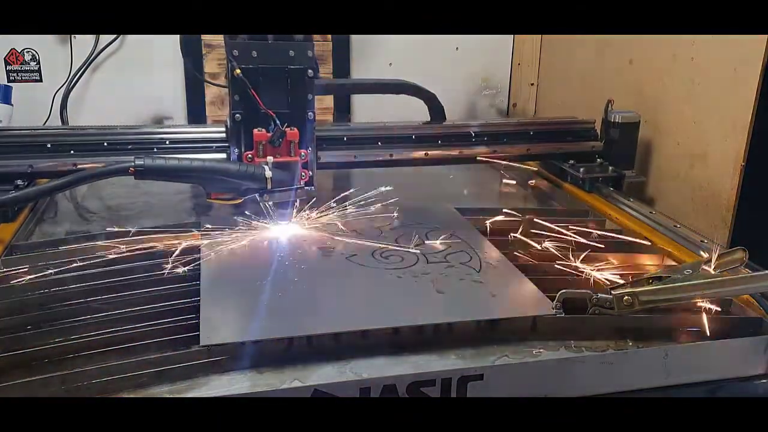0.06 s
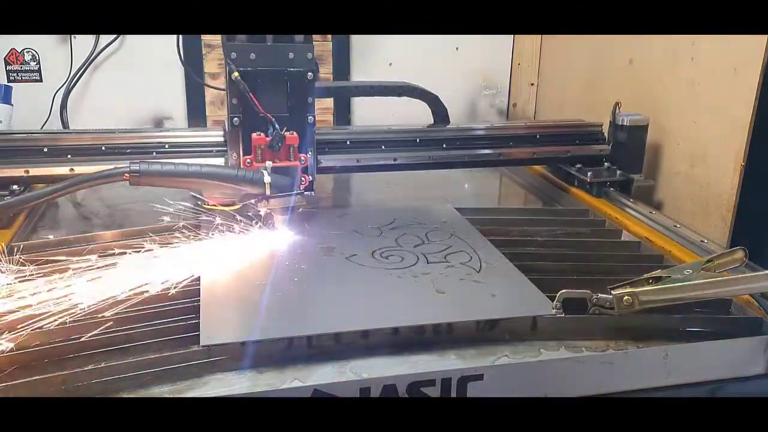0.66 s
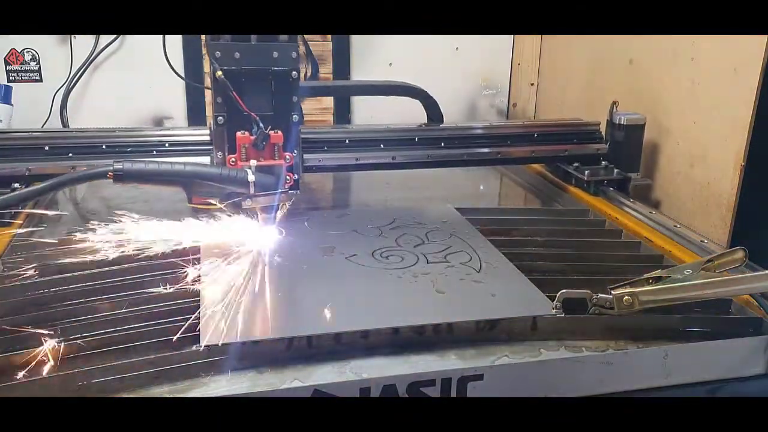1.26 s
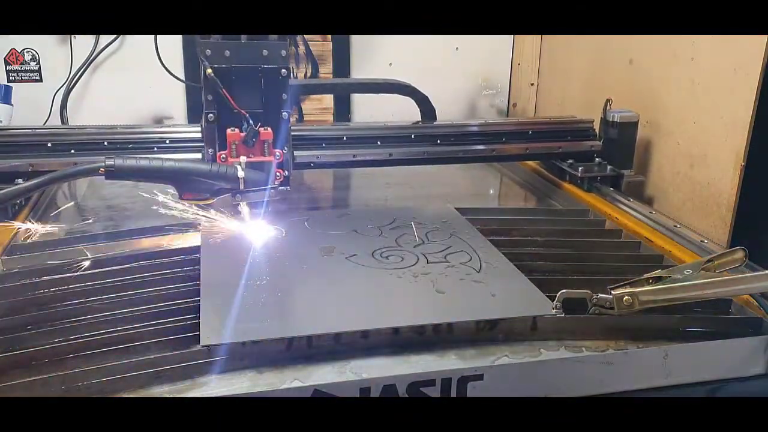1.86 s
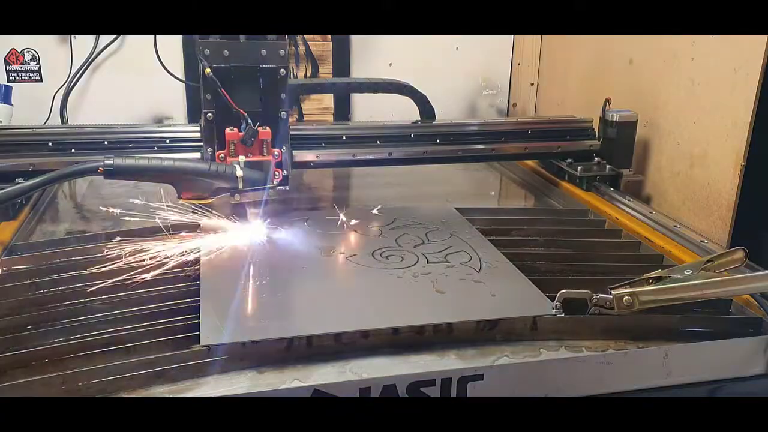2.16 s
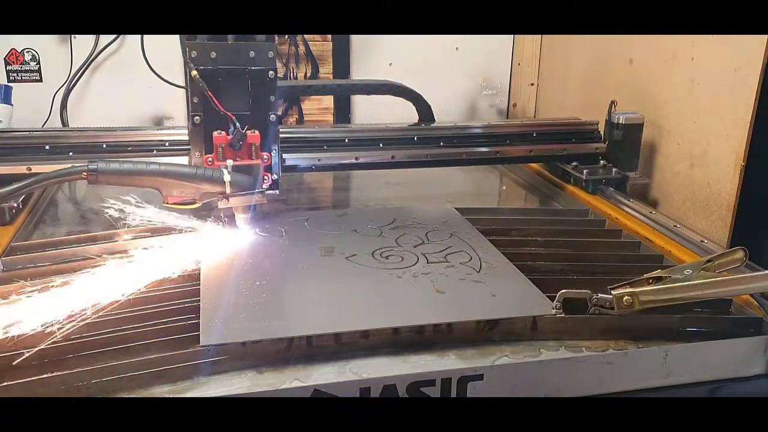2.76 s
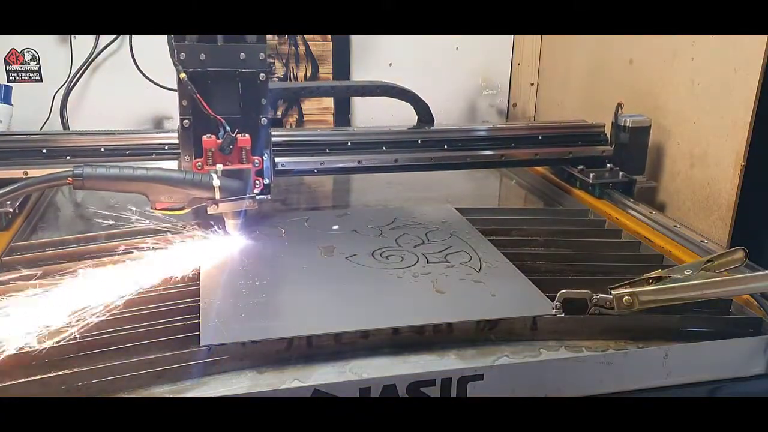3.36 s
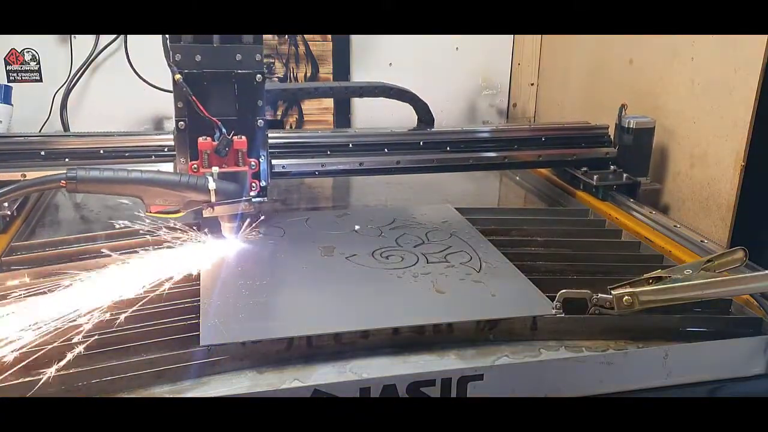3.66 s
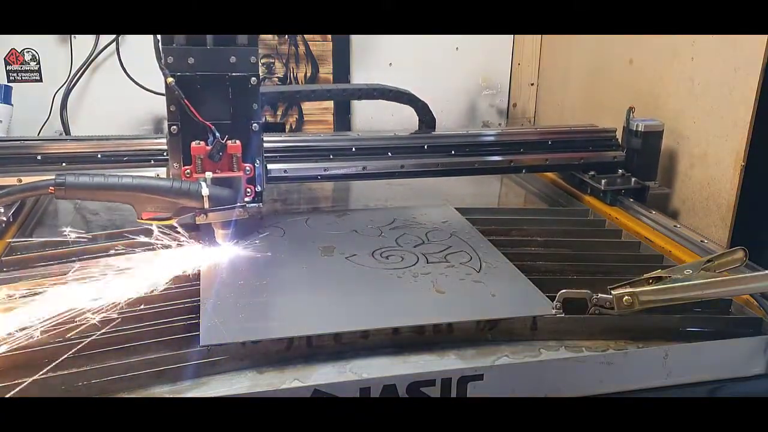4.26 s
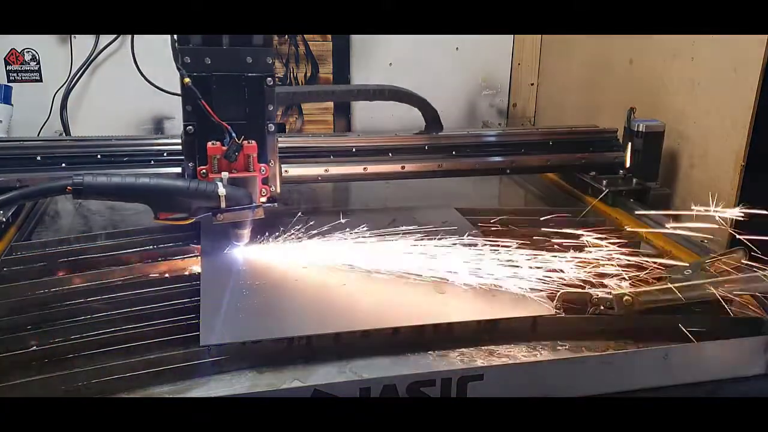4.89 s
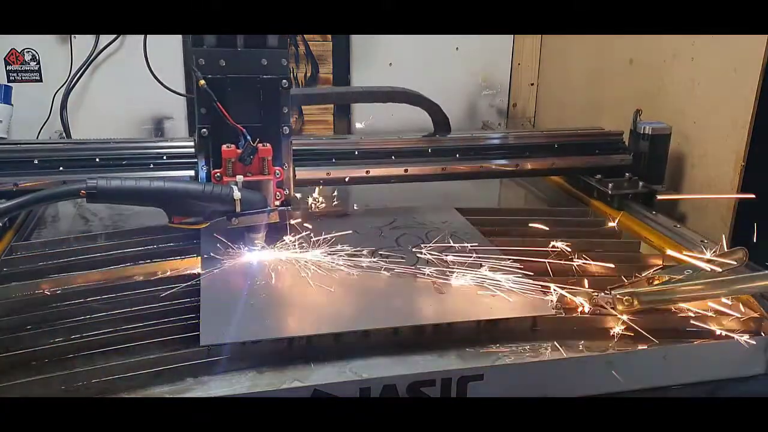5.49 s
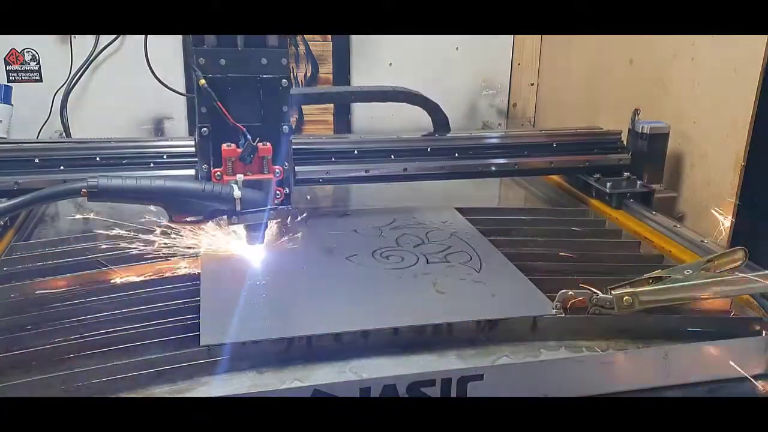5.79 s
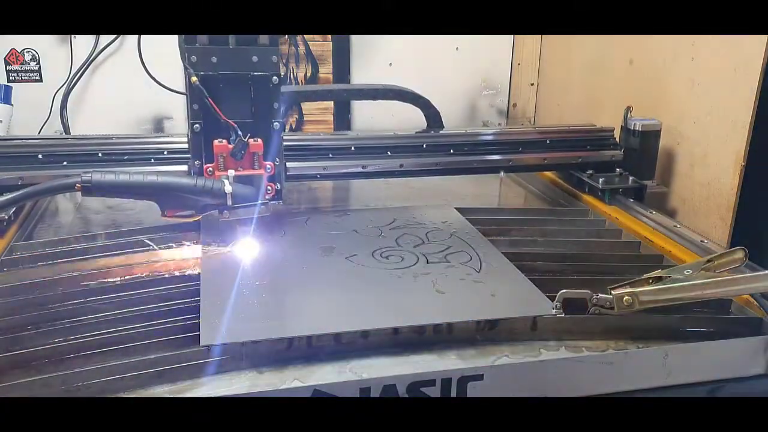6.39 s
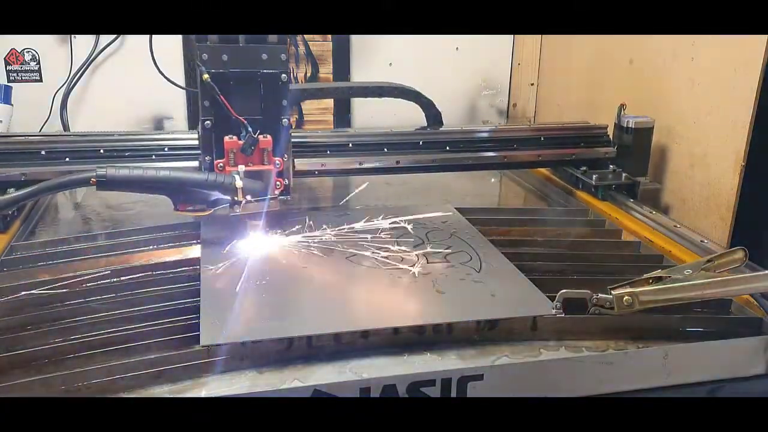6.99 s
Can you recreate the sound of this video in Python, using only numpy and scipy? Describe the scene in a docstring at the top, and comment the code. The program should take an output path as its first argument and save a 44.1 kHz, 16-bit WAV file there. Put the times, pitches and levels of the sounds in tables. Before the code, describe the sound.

The harsh, unbroken hiss of a plasma cutter fills a workshop as it moves through a steel sheet. A rasp and a hollow roar ride along with it, sputtering in brief surges, and howls and whistles come and go at changing pitches. Fine ticks of slag run throughout. The stereo microphone stands beside the cutting table and picks up a faint low rumble and hum.

```python
"""Plasma torch over a water table

In a workshop, a machine-guided torch cuts sheet steel above a slatted water table, the left side of the
stereo microphone a little nearer to it. The air jet hisses at the nozzle, rasps through the kerf and
roars in the hollow under the sheet. It howls and whistles on the kerf's resonances and flares where it
catches an edge. Slag crackles; air rumbles faintly on the microphone, and machinery hums."""
import sys
import numpy as np
from scipy import signal
from scipy.fft import rfft, irfft, next_fast_len
from scipy.io import wavfile
from scipy.ndimage import uniform_filter1d, map_coordinates

SR = 44100
rng = np.random.default_rng(int(sys.argv[2]) if len(sys.argv) > 2 else 0)


def digitize_waveform(pressure):
    """Quantize a signal to 16-bit integers and store it at the path in sys.argv[1].

    Rows of a 2-D input are taken as channels; values are limited to [-1, 1].
    """
    field = np.atleast_2d(pressure).T
    bounded = np.clip(field, -1, 1)
    quanta = np.round(bounded * 32767).astype(np.int16)
    wavfile.write(sys.argv[1], SR, quanta)


N = 319284
TIME = np.arange(N) / SR
BIN_HZ = np.fft.rfftfreq(1024, 1 / SR)[:, None]  # rows of a short-time spectrum


def amp(db):
    """Decibels to gain."""
    return 10 ** (np.asarray(db) / 20)


def unit(x):
    """x at rms 1."""
    return x / np.sqrt(np.mean(x ** 2) + 1e-20)


def bell(x):
    """A Gaussian of height 1 and width 1."""
    return np.exp(-.5 * x ** 2)


def along(points, hz):
    """(f/Hz, value) points read on a log axis."""
    freqs, values = np.transpose(points)
    return np.interp(np.log(hz + 1), np.log(freqs + 1), values)


def curve(points, t=TIME):
    """(t/s, value) points read at times t."""
    return np.interp(t, *np.transpose(points))


def wobble(rate):
    """A smooth random curve, rate knots a second."""
    knots = rng.standard_normal(int(N * rate / SR) + 4)
    return map_coordinates(knots, [TIME * rate])


def filtered(x, response):
    """x times a response of frequency."""
    n = x.shape[-1]
    padded = next_fast_len(n + SR // 8, True)
    return irfft(rfft(x, padded) * response(np.fft.rfftfreq(padded, 1 / SR)), padded)[..., :n]


def steady(x):
    """x with its slow changes of level evened out."""
    power = uniform_filter1d(np.mean(x ** 2, axis=0), size=SR // 8)
    return x / np.sqrt(np.abs(power) + 1e-12)


# resonances of the sheet, the table and the corner of the room: f/Hz, width/Hz, lift/dB
RESONANCES = [(276.5, 23.6, 9.5), (339, 48, 8.5), (414.5, 12, 9.5), (457, 21, 5.5), (540.8, 29, 14),
              (576.7, 18, 10.5), (621, 20, 9.5), (684, 17.5, 10.5), (752.5, 17, 10.5), (810, 26, 12),
              (942, 30, 8.5), (1031, 35, 9.5), (1079, 37, 5), (1138, 12, 7), (1202, 21, 5.5),
              (1310.4, 24, 12), (1444, 38, 9), (1575, 79, 5.5), (1733, 28, 6.5), (1835, 56, 4.5),
              (2666, 210, 3.5), (2890, 150, 1)]
# likeness of left and right at the microphone: f/Hz, likeness (1 or more is mono)
STEREO_LIKENESS = [(200, 2.5), (260, 5), (340, 1.1), (450, 0.98), (750, 0.26), (1300, 0.29), (2000, 0.03),
                   (3000, 0.19), (5000, 0.09), (8000, 0.11), (15000, 0.12)]
# echoes off the side walls: delay/s
WALL_DELAYS = [.0047, .0113, .0171, .026]
# the walls' part in the left-right difference: f/Hz, share
WALL_ECHO_SHARE = [(300, 0.83), (1400, 1), (3000, 0.68), (6000, 0.044)]

def in_workshop(pair, colour):
    """Two noises as they reach the microphone: coloured, rung through the table, spread wide; rms 1."""
    def response(hz):
        lift_db = sum(db / (1 + (2 * (hz - centre) / width) ** 2) for centre, width, db in RESONANCES)
        spread = np.arccos(np.clip(along(STEREO_LIKENESS, hz), -1, 1)) / 2
        share = np.clip(along(WALL_ECHO_SHARE, hz), 0, 1)
        echoes = sum(np.exp(-2j * np.pi * hz * delay) for delay in WALL_DELAYS)
        wall_path = np.sin(spread) * share * np.exp(1j * np.angle(echoes))
        diffuse_path = np.sin(spread) * np.sqrt(1 - share ** 2)
        return colour(hz) * amp(lift_db) * np.array([np.cos(spread), wall_path, diffuse_path])
    mid, echo, diffuse = filtered(pair[[0, 0, 1]], response)
    return unit(np.array([mid + echo + diffuse, mid - echo - diffuse]))


def rush(spectrum, pair):
    """Two noises shaped by (f/Hz, level/dB) points and heard across the workshop."""
    return in_workshop(pair, lambda hz: amp(along(spectrum, hz)))


def eddies(patchy_db, echo_db, colour_db=None):
    """Two patchy noises, combed by nearby reflections whose paths drift as the torch moves."""
    _, t, spectra = signal.stft(rng.standard_normal((2, N)), SR, nperseg=1024)
    patches = rng.standard_normal(spectra.shape[1:])
    for _ in range(2):
        patches = uniform_filter1d(patches, size=16, axis=0)
        patches = uniform_filter1d(patches, size=3, axis=1)
    combs = np.zeros(spectra.shape)
    for comb in combs:
        for delay in rng.uniform(0.001503, .009, size=6):
            drift = .00012 * np.sin(2 * np.pi * (rng.uniform(0.1914, .7) * t + rng.random()))
            comb += np.cos(2 * np.pi * BIN_HZ * (delay + drift))
    gain_db = patchy_db * unit(patches) + echo_db * unit(combs) + (colour_db(t) if colour_db else 0)
    return signal.istft(spectra * amp(gain_db), nperseg=1024)[1][:, :N]


# moments when the jet catches on nothing: t/s, depth/dB, f/Hz, half length/s
JET_LULLS = [(0.838, 11, 3000, .031), (1.127, 9, 600, 0.027), (1.605, 4, 4800, .022),
             (2.198, 6.5, 1200, 0.031), (2.2, 2, 9000, 0.044), (2.298, 7, 2500, .016),
             (3.174, 5.5, 4800, 0.047), (3.199, 8, 1500, 0.018), (3.282, 5.5, 1010, 0.014),
             (3.355, 7, 2000, 0.014), (3.434, 6, 7000, .03), (3.508, 7, 2200, 0.022),
             (3.593, 9, 3300, 0.0098), (3.92, 3, 1200, 0.034), (4.24, 7, 2300, 0.019),
             (5.02, -1, 4500, .025), (5.81, 12, 1460, 0.034), (6.335, 4.5, 546, 0.035),
             (6.495, 6, 2600, .016)]

def lull(hz, reach_octaves=0.82):
    """The dB that the part of the jet around hz loses in the lulls, at each sample."""
    return sum(db * bell(np.log2(hz / centre) / reach_octaves) * bell((TIME - s) / length)
               for s, db, centre, length in JET_LULLS)


# resonance of the gap under the torch: t/s, f/Hz
GAP_TUNING = [(0, 1120), (.5, 1090), (1.2, 1170), (1.9, 1260), (3.0, 1380), (3.2, 1460), (3.42, 1150),
              (3.85, 1290), (4.05, 1620), (4.24, 1230), (4.45, 1330), (5.35, 1260), (6.6, 1320),
              (6.78, 940), (7.24, 950)]

def gap_resonance(t, lift_db=7, octaves=0.14):
    """The gap's peak shifts as the torch travels: its lift in dB over frequency and time."""
    detuning = np.log2((BIN_HZ + 1) / curve(GAP_TUNING, t))
    return lift_db / (1 + (detuning / octaves) ** 2)


# the jet from top to bottom; spectra: f/Hz, level/dB; levels before trim and flutter: t/s, level/dB
HISS_SPECTRUM = [(1000, -63), (3000, -5.5), (4800, 0), (6300, 1.5), (7700, 1), (8700, -3), (9800, -3),
                 (11600, 0.5), (13500, 0.5), (15500, -0.5)]  # at the nozzle
HISS_LEVEL = [(0.0, -25.5), (0.14, -27.5), (0.33, -24), (.62, -27), (.76, -29), (.94, -27), (1.1, -30),
              (1.26, -24.5), (1.42, -29), (2.03, -27), (2.25, -27.5), (2.42, -27.5), (2.92, -26.5),
              (3.45, -28.5), (3.7, -29), (4.05, -25.5), (4.3, -27.5), (4.84, -29), (5.45, -28.5),
              (5.62, -26), (5.9, -28.5), (6.3, -25.5), (6.68, -29.5), (7.24, -27.5)]
RASP_SPECTRUM = [(900, -27), (1700, -2.5), (2050, 0.5), (2350, -3.5), (2750, 0.5), (3600, 1), (4600, -4),
                 (6500, -10), (12000, -17.5)]  # in the kerf
RASP_LEVEL = [(0, -28.5), (.2, -33), (1.3, -31.5), (2.05, -31), (2.25, -32), (2.55, -34.5), (2.8, -31),
              (3.1, -31.5), (3.55, -35.5), (3.95, -32.5), (4.5, -30), (5.0, -33.5), (5.3, -30.5),
              (5.7, -30), (6.05, -33.5), (6.55, -32), (6.8, -32), (7.24, -32.5)]
ROAR_SPECTRUM = [(300, -28), (700, -17), (900, -6.5), (1100, -1), (1300, 0), (1600, 0), (2000, -3.5),
                 (2600, -5.5), (5000, -10.5)]  # under the sheet
ROAR_LEVEL = [(0.0, -33), (0.55, -34), (1.12, -31), (1.28, -27.5), (2.16, -31), (2.6, -28.5), (2.85, -29),
              (3.4, -26.5), (3.52, -32), (4.28, -34.5), (4.4, -28.5), (4.76, -29), (4.96, -37.5),
              (5.28, -30.5), (6.03, -30), (6.17, -27.5), (6.33, -30), (6.56, -27.5), (6.8, -37),
              (7.08, -41.5), (7.24, -32.5)]
BOOM_SPECTRUM = [(100, -56), (170, -24), (220, -16.5), (255, -13.5), (298, -18.5), (335, -8.5), (490, -5.5),
                 (600, -2.5), (800, -5.5), (875, -5), (1020, -6.5), (1300, -12), (2500, -20)]  # down between the slats
BOOM_LEVEL = [(0.0, -35), (0.55, -38), (0.85, -31), (1.16, -38), (1.4, -36), (1.7, -37.5), (2.25, -37),
              (2.5, -38), (3.0, -38.5), (3.12, -37.5), (3.9, -40), (4.12, -39), (4.45, -36.5), (4.7, -34),
              (5.0, -36), (5.48, -33), (5.64, -38.5), (5.8, -30.5), (6.15, -30.5), (6.35, -36), (6.6, -32),
              (7.24, -37)]

def jet():
    """Turbulent air hisses, rasps, roars and booms on its way through the sheet, shaken by the melt."""
    surge = wobble(rate=9)  # the melt builds up and is blown clear
    boom_waver = wobble(rate=18)
    melt = wobble(rate=45)
    sputter = wobble(rate=290)  # the arc's foot jumps about in the kerf
    hiss = rush(HISS_SPECTRUM, eddies(patchy_db=1.24, echo_db=3.0))
    rasp = steady(rush(RASP_SPECTRUM, eddies(patchy_db=2.5, echo_db=4.5)))
    roar = steady(rush(ROAR_SPECTRUM, eddies(patchy_db=1.15, echo_db=4.0, colour_db=gap_resonance)))
    boom = steady(rush(BOOM_SPECTRUM, eddies(patchy_db=2.2, echo_db=2.2)))
    hiss_flicker = 0.23 * wobble(rate=33) + 0.29 * sputter
    hiss_db = curve(HISS_LEVEL) + 0.4 - lull(hz=8750) + 0.98 * surge + hiss_flicker
    rasp_db = curve(RASP_LEVEL) + 1.25 - lull(hz=3000) + 0.67 * surge + 1.1 * melt + .5 * sputter
    roar_db = curve(ROAR_LEVEL) + 0.35 - lull(hz=1300) + 1.2 * surge + 1.2 * melt + .5 * sputter
    boom_db = curve(BOOM_LEVEL) - 0.8 - lull(hz=554) + 0.71 * boom_waver + 1.5 * melt
    return amp(hiss_db) * hiss + amp(rasp_db) * rasp + amp(roar_db) * roar + amp(boom_db) * boom


# held resonances of the kerf or the slats: start/s, end/s, level/dB, f/Hz, width/Hz
HELD_HOWLS = [(0, 0.394, -45.5, 560, 50), (0, .55, -47, 1490, 70), (0, .5, -48, 1790, 80),
              (0, .45, -39, 2200, 130), (.2, 1.1, -42, 2680, 160), (1.25, 1.58, -42, 1800, 90),
              (1.24, 1.517, -38.5, 560, 65), (1.3, 2.0, -47.5, 810, 70), (1.597, 1.79, -37, 560, 60),
              (1.663, 2.1, -48, 1870, 80), (1.86, 2.305, -42.5, 550, 60), (2.677, 3.182, -41, 3070, 220),
              (2.787, 3.175, -39, 1830, 69.5), (4.327, 5.4, -40.5, 1600, 80),
              (4.404, 4.694, -38.5, 2550, 130), (4.447, 5.46, -39, 1245, 90), (5.08, 5.32, -41, 3050, 110),
              (5.35, 6.7, -40.5, 676, 168), (6.55, 7.24, -48, 2980, 160), (6.698, 7.245, -38.5, 796, 55),
              (6.76, 7.24, -40.5, 1600, 65), (6.847, 7.24, -50, 1940, 70)]

def howls(attack_s=0.056, release_s=.07, waver_db=1.2):
    """The jet holds a resonance for a while: narrow, wavering noise that swells and fades."""
    out = np.zeros((2, N))
    for start, end, db, centre, width in HELD_HOWLS:
        hold = np.clip(np.minimum((TIME - start) / attack_s, (end - TIME) / release_s) + .5, 0, 1)
        on = np.flatnonzero(hold)
        waver = wobble(rate=14)[on]
        band = lambda hz: 1 / (1 + (1.22 * (hz - centre) / width) ** 2)
        noise = in_workshop(rng.standard_normal((2, N))[:, on], band)
        out[:, on] += amp(db + waver_db * waver) * hold[on] * noise
    return out


# faint low rumble of air on the microphone: f/Hz, level/dB
RUMBLE_SPECTRUM = [(12, -29), (25, 3.5), (41, 0.5), (55, -3), (80, 0.5), (100, -4.5), (135, -35),
                   (165, -11.5), (200, -11), (260, -3.5), (330, 3.5), (500, -23)]

def rumble_and_hum(rumble_db=-56, hum_db=-68, hum_hz=67.7, follows_flow=1.2, fade_db_per_s=.5):
    """Air rumbles on the microphone, growing with the jet's flow and slowly receding; machinery hums."""
    flow_db = curve(HISS_LEVEL)
    waver_db = 4.0 * wobble(rate=6)
    swell_db = follows_flow * (flow_db - flow_db.mean()) + waver_db
    fade_db = fade_db_per_s * (TIME - TIME.mean())
    rumble = unit(filtered(rng.standard_normal(N), lambda hz: amp(along(RUMBLE_SPECTRUM, hz))))
    hum = unit(np.sin(2 * np.pi * hum_hz * TIME + .6 * wobble(rate=2.76)))
    return amp(rumble_db + swell_db - fade_db) * rumble + amp(hum_db) * hum


def slag(per_s=90, level_db=-44, spread_db=4.5, decay_s=0.0004):
    """Droplets of molten steel burst and tick against the sheet and slats."""
    count = int(per_s * N / SR)
    ticks = np.zeros((2, N))
    onsets = rng.integers(N, size=count)
    sizes = amp(spread_db * np.minimum(rng.exponential(size=count), 4))
    t = np.arange(SR // 400) / SR
    samples = np.minimum(onsets[:, None] + np.arange(len(t)), N - 1)
    for train in ticks:
        bursts = sizes[:, None] * np.exp(-t / decay_s) * rng.standard_normal(samples.shape)
        train += np.bincount(samples.ravel(), bursts.ravel(), N)
    return amp(level_db) * rush([(800, -13.5), (2500, -11.0), (15000, -2.0)], ticks)


def swells(rows, rise=0.99, fall=1.7, ring_db=-9, ring_t60_s=.3):
    """The jet swells around one pitch, rising faster than it fades, and the workshop rings on."""
    out = np.zeros((2, N + 2 * SR))  # a spare second at each end
    for s, db, centre, octaves, length in rows:
        t = np.arange(-2.5 * length, 3 * length + ring_t60_s / 2, 1 / SR)
        band = lambda hz: bell(np.log2((hz + 1) / centre) / octaves)
        noise = in_workshop(rng.standard_normal((2, len(t))), band)
        swell = bell(t / length / np.where(t < 0, rise, fall))
        ring = amp(ring_db - 60 * t / ring_t60_s) * (1 - swell) * (t > 0)
        start = SR + round((s + t[0]) * SR)
        out[:, start:start + len(t)] += amp(db) * np.hypot(swell, ring) * noise
    return out[:, SR:SR + N]


# whistles in the kerf: t/s, level/dB, f/Hz, half length/s
KERF_WHISTLES = [(0.074, -33, 1124, 0.038), (0.23, -28.5, 1125, 0.0084), (0.623, -31, 2590, .02),
                 (1.311, -34, 4870, 0.015), (1.64, -37, 4950, 0.019), (2.375, -33, 3260, 0.016),
                 (2.58, -33.5, 1116, 0.041), (2.6, -38, 820, 0.02), (2.89, -29.5, 1084, 0.023),
                 (3.047, -34, 2160, 0.032), (3.15, -34.5, 810, 0.029), (4.069, -32.5, 1710, 0.018),
                 (4.551, -29, 2560, 0.027), (5.763, -29, 755, 0.012), (5.85, -36.5, 408, 0.063),
                 (5.905, -35, 2230, .018), (5.925, -31, 1740, 0.013), (6.468, -33, 735, .018),
                 (6.631, -35.5, 710, 0.015), (7.052, -31.5, 776, 0.016)]

def whistles(width_octaves=0.047):
    """The jet locks briefly on to one pitch of the kerf."""
    return swells([(s, db, hz, width_octaves, length) for s, db, hz, length in KERF_WHISTLES])


# flares along the cut: t/s, level/dB, f/Hz, width/octaves, half length/s
EDGE_FLARES = [(.445, -40, 370, 0.18, 0.011), (.64, -30, 3300, 0.43, 0.017), (.672, -30, 700, .35, .007),
               (.677, -20.5, 1360, 0.5, 0.013), (.728, -26.5, 1500, 0.24, 0.024),
               (1.08, -31, 2800, 0.52, 0.015), (1.313, -34, 6000, 0.36, 0.018),
               (1.415, -31, 3460, 0.14, 0.013), (1.473, -29, 2850, .15, 0.015),
               (1.525, -33, 3950, .12, .015), (1.72, -29, 1220, 0.23, 0.019), (2.0, -30, 5500, 0.46, 0.016),
               (2.068, -25.5, 4770, 0.39, 0.02), (2.125, -33.5, 430, 0.29, .014),
               (2.252, -31.5, 477, 0.46, 0.013), (2.333, -28, 1200, 0.3, 0.011),
               (2.368, -23.5, 1330, 0.44, 0.0062), (2.376, -28.5, 2980, 0.55, 0.021),
               (2.885, -29, 1370, 0.2, 0.027), (3.124, -25.5, 1410, 0.64, 0.012),
               (3.245, -34, 1560, .2, .01), (3.272, -32, 3700, .1, .01), (3.305, -28, 2800, 0.17, .009),
               (3.32, -23.5, 1500, 0.4, 0.0086), (3.338, -29.5, 706, 0.36, .01),
               (3.385, -34, 504, 0.38, .018), (3.398, -22, 1280, 0.39, 0.015),
               (3.58, -32.5, 505, 0.4, 0.012), (3.647, -30, 2020, 0.73, 0.011),
               (3.718, -30.5, 2570, 0.11, 0.011), (3.805, -27, 1200, 0.17, 0.013),
               (4.006, -23, 1910, 0.36, 0.0091), (4.12, -28, 6300, .5, 0.017),
               (4.145, -33.5, 610, 0.41, 0.013), (4.25, -31.5, 1107, 0.058, .015),
               (4.3, -26.5, 9000, 0.99, 0.014), (4.305, -38.5, 513, 0.86, .012),
               (4.865, -29, 2930, 0.25, 0.019), (5.125, -27.5, 4100, 0.82, 0.02),
               (5.13, -31, 596, 0.58, 0.019), (5.255, -29, 2700, 0.42, 0.017),
               (5.288, -29, 543, 0.39, 0.015), (5.3, -29.5, 1270, 0.32, 0.02),
               (5.445, -31, 693, 0.14, 0.022), (5.68, -30, 3030, 0.25, 0.019),
               (5.69, -29, 1300, 0.062, .028), (5.768, -35, 423, 0.18, .013),
               (5.897, -24.5, 1500, 0.76, 0.014), (5.935, -29.5, 670, 0.19, 0.018),
               (6.15, -32, 630, 0.18, 0.023), (6.19, -33.5, 1850, 0.29, 0.051),
               (6.446, -30, 1430, 0.77, 0.015)]

def flares():
    """The jet catches an edge of the kerf and throws out a burst of noise."""
    return swells(EDGE_FLARES)


def scene():
    """Everything heard from beside the cutting table."""
    return jet() + howls() + flares() + whistles() + slag() + rumble_and_hum()


# colour of the microphone's two ports: f/Hz, left minus right/dB
PORT_BALANCE = [(350, -2.5), (440, -2), (540, -0.5), (900, 2), (1250, -2), (1800, 3.5), (2150, 2),
                (2550, 3), (3000, -0.5), (4200, -1.5), (6300, 2), (8150, 1), (9200, -2.5), (11000, -4.5),
                (14000, -0.5), (15500, -2)]

def record(dry, lead_s=.00012, top_hz=15660):
    """A band-limited stereo microphone; the left port, nearer the torch, gets the treble first."""
    side = np.array([[.5], [-.5]])
    def ports(hz):
        balance = amp(side * along(PORT_BALANCE, hz))
        treble_lead = np.exp(2j * np.pi * hz * side * lead_s * (hz > 2000))
        return balance * treble_lead * (hz < top_hz)
    return filtered(dry, ports)


dry = scene()
out = record(dry)
digitize_waveform(out)
```